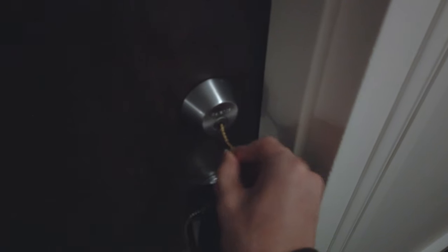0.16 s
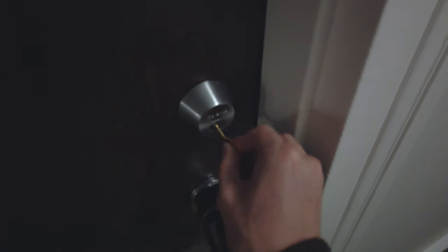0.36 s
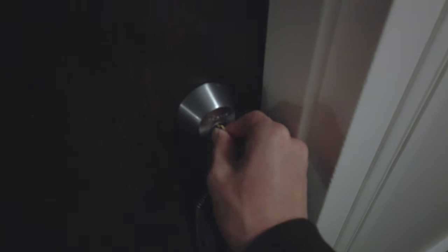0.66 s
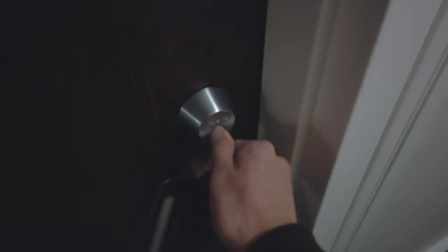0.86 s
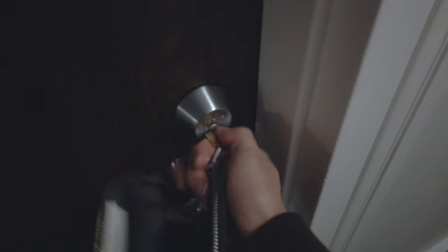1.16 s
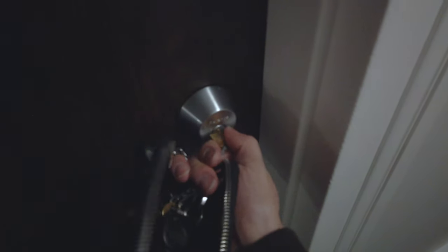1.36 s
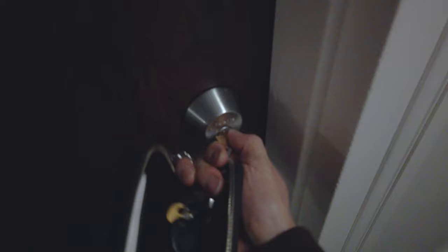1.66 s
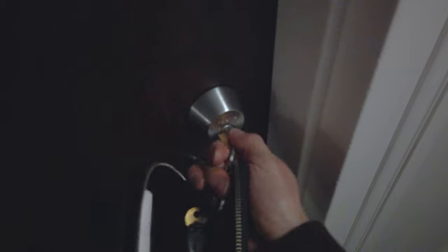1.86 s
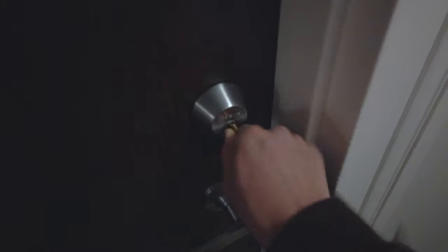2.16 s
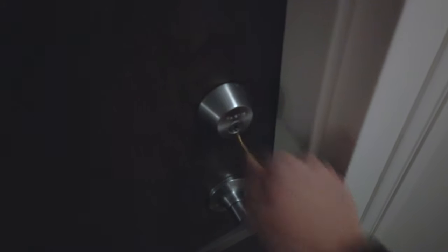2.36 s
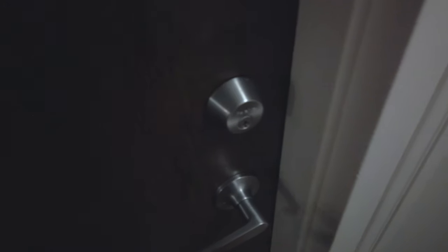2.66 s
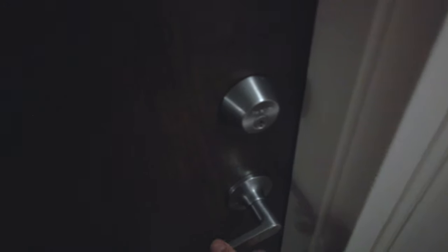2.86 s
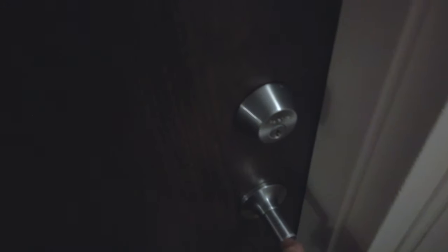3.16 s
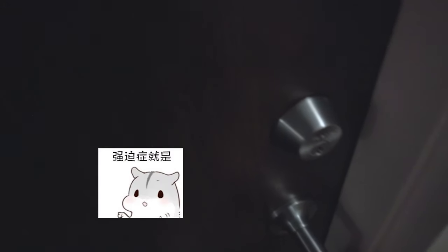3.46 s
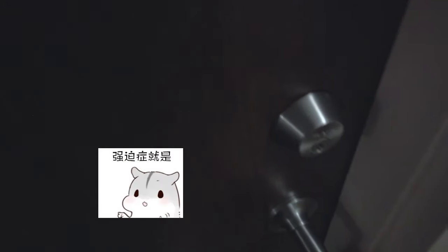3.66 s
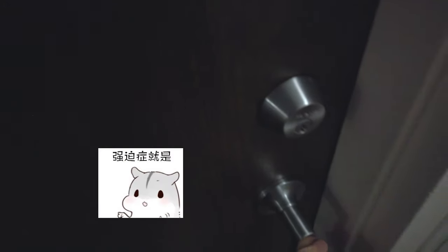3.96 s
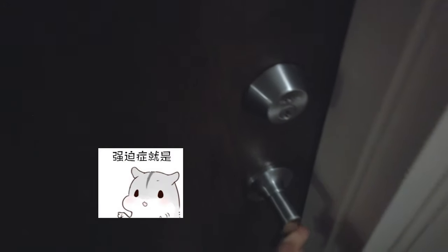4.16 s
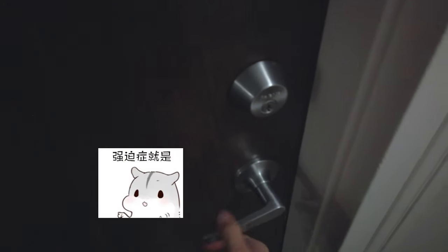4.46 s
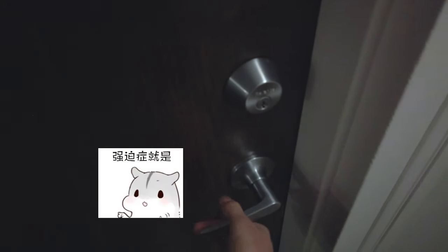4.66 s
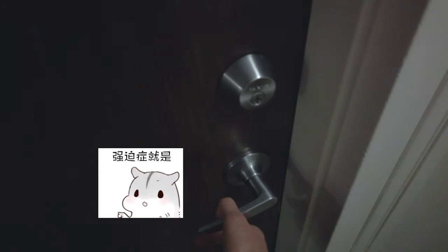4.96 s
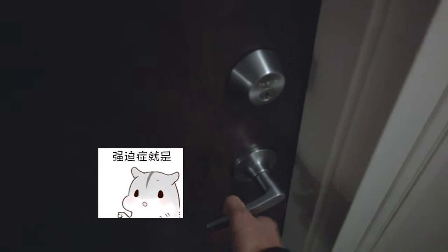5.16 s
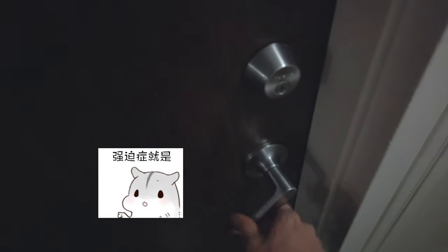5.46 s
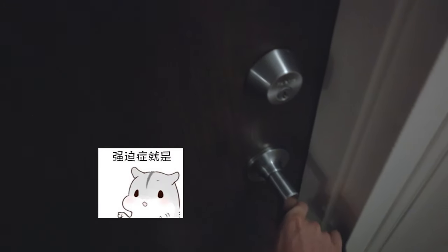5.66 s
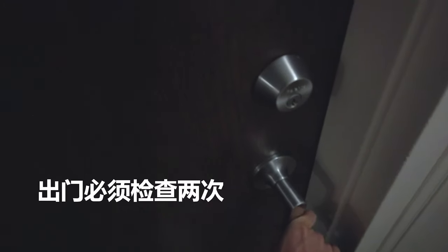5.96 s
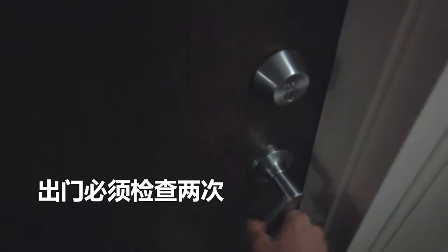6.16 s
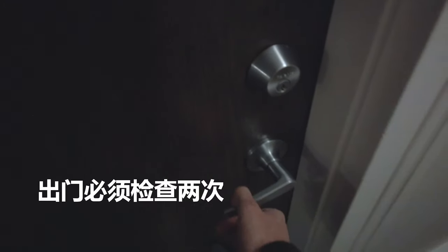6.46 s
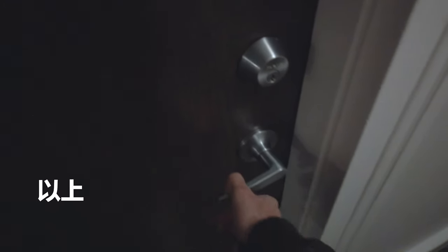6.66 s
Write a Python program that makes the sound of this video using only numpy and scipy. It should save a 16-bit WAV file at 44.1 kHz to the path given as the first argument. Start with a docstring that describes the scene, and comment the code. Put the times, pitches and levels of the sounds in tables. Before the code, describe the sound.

Close metallic clicks and door knocks from a turning lock, jingling keys, brief spring squeaks and uneven handle rattles, with short indoor echoes.

```python
"""Bolt, latch and lever knock into a door leaf as a deadbolt is turned and a locked door's handle is worked.
Each knock is a burst of uneven contacts ringing door and lock modes; small ticks ring the lock alone.
Filtered contact noise makes rubbing and leaf movement, a wavering harmonic tone the lever spring's squeaks.
A bunch of keys clinks and slides in resonant ticks; decaying noise gives hallway echoes over a steady hush.
Two microphone ports a few centimetres apart hear the sounds at slightly different moments."""
import sys
import numpy as np
from scipy import signal
from scipy.fft import rfft, irfft, next_fast_len
from scipy.io import wavfile

SR = 44100
rng = np.random.default_rng(int(sys.argv[2]) if len(sys.argv) > 2 else 0)


def inscribe(sig):
    """Save sig as 16-bit PCM at rate SR to the path in sys.argv[1].

    A 1-D sig is mono; a 2-D sig holds one channel per row.
    Samples are clipped to [-1, 1] before scaling.
    """
    pcm = np.round(np.clip(np.atleast_2d(sig).T, -1, 1) * 32767)
    wavfile.write(sys.argv[1], SR, pcm.astype(np.int16))


N = 299880
SIZE = next_fast_len(N + SR)   # transform length, leaves room for one second of echo
HZ = np.maximum(np.arange(SIZE // 2 + 1) * SR / SIZE, 1)
PORT_GAP_S = 0.0001666   # sound travel time between the ports

# resonances of door (first ten rows) and lock (the rest): (centre [Hz], basic width [Hz], relative level [dB])
BODY_MODES = [(130, 200, -12.5), (198, 56, 1.5), (248, 14.8, -0.5), (301.8, 34, 2.5), (353, 61, 2.5),
              (496, 96, 0.5), (716, 75, -6.5), (858, 106, -5), (1076, 98, -8), (1276, 260, -6.5),
              (1800, 470, -3.5), (2140, 153, -0.5), (2474, 450, -3), (2930, 186, -3), (3207, 110, -0.5),
              (3750, 700, -10), (4500, 430, -21), (5300, 940, -20), (6200, 2600, -26), (8200, 1900, -21),
              (10870, 870, -16)]
# resonances of the bunch of keys: (centre [Hz], basic width [Hz], relative level [dB])
KEY_MODES = [(3250, 90, -20), (4800, 120, -26), (6550, 150, -20), (7560, 110, -12), (8270, 50, -3),
             (8650, 150, -12), (9940, 45, -2), (10150, 60, -6), (10400, 100, -8), (10900, 130, -6),
             (11540, 55, -4), (12100, 90, -6), (12350, 55, -4), (13000, 200, -12), (13850, 45, -3),
             (15200, 200, -14), (11000, 6000, -24)]


def from_db(db):
    """Level in dB to amplitude."""
    return 10 ** (np.asarray(db) / 20)


def rms_one(x):
    """Scales a sound to an RMS of 1."""
    return x / np.sqrt(np.mean(x ** 2) + 1e-20)


def at_hz(points, hz):
    """Reads a table on a log-frequency axis."""
    points = np.array(points)
    return np.interp(np.log(hz), np.log(points[:, 0]), points[:, 1])


def in_time(rows, s):
    """The columns of a curve at the times s."""
    return [np.interp(s, np.array(rows)[:, 0], c) for c in np.transpose(rows)[1:]]


def add(track, s, sound):
    """Mixes a sound in at a time."""
    i = round(s * SR)
    track[..., i:i + sound.shape[-1]] += sound[..., :N - i]


def modes(table, hz, extra_db=0, damping=1):
    """Left and right response of parallel resonances; each radiates from its own patch, so has its own lag."""
    skirt = .6   # band that a mode radiates into, as a share of its pitch
    lean = 0.32   # the sources sit a little nearer the left port, as a share of the gap
    one_piece_hz = 600   # below this the leaf moves more and more as one piece and the lag shrinks
    centre, width, db = np.transpose(table)[:, :, None]
    signs = (-1.) ** np.arange(len(table))[:, None]
    gain = from_db(db + np.reshape(extra_db, (-1, 1))) * signs
    width = width * damping
    detune = centre ** 2 - hz ** 2
    each = gain * 1j * hz * width / (detune + 1j * hz * width)
    each = each * 1j * hz * centre * skirt / (detune + 1j * hz * centre * skirt)   # little sound far off pitch
    patch = np.clip(lean + rng.uniform(-0.99, 1, (len(table), 1)), -1, 1)
    lag = PORT_GAP_S * patch * np.minimum(centre / one_piece_hz, 1)
    half_lag = np.exp(1j * np.pi * hz * lag)
    return np.array([np.sum(each * half_lag, axis=0), np.sum(each / half_lag, axis=0)])


def grit(size, spread_db):
    """Contacts of very uneven strength and random sign."""
    strength_db = spread_db * np.minimum(rng.exponential(1, size), 5)
    return from_db(strength_db) * rng.choice([-1, 1], size)


def strike(contacts, table, extra_db, damping, low_hz, high_hz):
    """A short run of contacts rings the body; peak 1 between the two frequencies."""
    size = 2 ** 13
    hz = np.arange(size // 2 + 1) * SR / size
    spectrum = rfft(contacts, size) * modes(table, hz, extra_db, damping)
    in_band = irfft(spectrum * (hz > low_hz) * (hz < high_hz))
    return irfft(spectrum)[:, :-64] / np.abs(in_band).max()


def rubbed(table, level_db, spread_db, catch_db=0):
    """Dense uneven contacts ring a body; slow noise makes them catch and let go."""
    response = modes(table, HZ)
    catching = rms_one(signal.lfilter([1], [1, -1.99, .990025], rng.standard_normal(N)))
    contacts = rms_one(grit(N, spread_db) * from_db(catch_db * catching)) * from_db(level_db)
    even_response = response / np.sqrt(np.mean(np.abs(response) ** 2))
    return irfft(rfft(contacts, SIZE) * even_response, SIZE)[:, :N]


def efforts(rows, rise_db_per_s, fall_db_per_s):
    """Each effort swells, is held and fades, overlaps adding in power; one level in dB per thing moved."""
    t = np.arange(0, N + 64, 64) / SR
    start, held, *levels = np.transpose(rows)[:, :, None]
    rise = -rise_db_per_s * np.maximum(start - t, 0)
    shape = rise - fall_db_per_s * np.maximum(t - start - held, 0)
    curves = [10 * np.log10(np.sum(from_db(db + shape) ** 2, axis=0)) for db in levels]
    return [np.interp(np.arange(N) / SR, t, curve) for curve in curves]


def knocks():
    """Each blow is a rattle of contacts that builds and dies, with its own tilt and strongest ring."""
    # bolt, latch and lever blows: (time [s], peak from 560 to 4180 Hz [dB], door thud before a 0.5 dB cut [dB],
    # hardness [dB], bright crack before a 14 dB boost [dB], strongest ring [Hz], rattle length [s])
    blows = [(0.164, -35.5, -10, -7, -32, 1970, 0.023), (0.176, -31, -9, -15.5, -70, 874, 0.017),
             (0.494, -49.5, 3, -23, -67, 1160, 0.014), (0.662, -24, -15.5, -7.5, -14, 900, 0.0096),
             (0.604, -33, -13, -13, -30, 1730, 0.017), (0.723, -26.5, -13, 3, -10, 2282, 0.03),
             (0.745, -24, -3.5, -7, -37, 662, 0.0088), (1.203, -34.5, -26, 2, -12.5, 3200, 0.012),
             (1.248, -32.5, 6, 1, -6, 3880, 0.04), (1.28, -14, -4.5, -8.5, -35, 1090, 0.012),
             (1.284, -17.5, -23, -3.5, -10.5, 3230, 0.0055), (1.337, -14.5, -9, -8.5, -16.5, 868, 0.0097),
             (1.355, -36.5, 17.5, -6, -41, 258, 0.035), (2.175, -41, -13, 8, -13, 2190, 0.029),
             (2.206, -42, -1.5, -2.5, -4, 1543, 0.023), (2.298, -34.5, -4, -56, -30, 710, 0.0074),
             (2.475, -35, -24, 0, -25, 3160, 0.0052), (2.497, -35, -8, -4, -21, 2900, 0.006),
             (2.523, -28, -33, 2, -36, 2880, 0.0074), (2.531, -39.5, -22, -17, -36, 905, 0.0091),
             (2.576, -39.5, -36, 15, -27, 1710, 0.0067), (3.063, -46.5, -1, -5.5, -63, 533, 0.011),
             (3.167, -36, 4.5, -8.5, -38, 1810, 0.024), (3.403, -22.5, -1, -7.5, -26, 2750, 0.0087),
             (3.755, -50, 14.5, -11, -14, 2180, 0.016), (4.073, -47, -6, -3.5, -59, 2550, 0.01),
             (4.533, -19.5, -13, -2, -17, 2960, 0.0111), (4.541, -17, -8, 2, -21, 2034, 0.01214),
             (4.55, -18.5, -6, -7.5, -35, 1110, 0.013), (4.569, -28, -20, -4, -39, 1320, 0.0056),
             (4.579, -28, -9.5, -14, -45, 920, 0.0074), (4.595, -34, 16, -2, -36, 3230, 0.0084),
             (4.731, -20, -16, 0, -27.5, 1610, 0.0091), (4.799, -37, 8.5, 4, -15.5, 523, 0.013),
             (4.957, -45.5, 11, -13.5, -43, 510, 0.013), (5.269, -38, 0, -6, -43, 1124, 0.0086),
             (5.527, -47, -24, 7, -16, 3020, 0.0093), (5.551, -41, -22, 10, -22, 2950, 0.0083),
             (5.622, -40.5, -17, 8, -24, 2980, 0.014), (5.65, -33, -3, -2, -26, 3000, 0.006),
             (5.764, -21.5, 1.5, -1, -28, 2930, 0.004), (6.309, -41.5, -13, 18, -18, 3300, 0.015),
             (6.383, -32, -15, 14, -24, 2960, 0.02), (6.425, -16.5, -24, -4, -30, 730, 0.017),
             (6.478, -23, 16, 8, -16, 556, 0.0079), (6.501, -28, 3.5, 2, -26, 1980, 0.0047),
             (6.604, -42, -53, -7, -70, 496, 0.019)]
    out, t, hz = np.zeros((2, N)), np.arange(3072) / SR, np.array(BODY_MODES)[:, 0]
    for s, db, thud_db, hard_db, crack_db, ring_hz, length in blows:
        rise = 0.004 + 0.25 * length   # build-up time [s]
        fall = np.maximum(t - rise, 0) / max(length, .0005)
        envelope = np.minimum(t / rise, 1) ** 1.26 * np.exp(-fall ** 0.75)
        colour = at_hz([(350, thud_db - 0.5), (600, 0.0087), (1100, 0), (1700, hard_db),
                        (3300, hard_db), (4800, crack_db + 14.0)], hz)
        colour = colour + 7 * np.exp(-(np.log(hz / ring_hz) / .12) ** 2)
        colour = colour + rng.normal(0, 2.5, len(hz))
        # grip and latch position detune the modes from blow to blow
        body = np.array(BODY_MODES) * [[1 + shift, 1, 1] for shift in rng.normal(0, .03, len(hz))]
        body[np.argmin(np.abs(hz - ring_hz)), 0] = ring_hz
        contacts = grit(len(t), 6.62) * envelope
        blow = strike(contacts, body, colour, damping=0.95, low_hz=560, high_hz=4180)
        add(out, s - 0.4 * rise, from_db(db) * blow)
    return out


def ticks():
    """One small hard contact: only the upper modes of the lock answer, briefly."""
    # pins and spring ticking inside the lock: (time [s], peak from 2300 to 6000 Hz [dB], strongest ring [Hz])
    contacts_in_lock = [(0.114, -51, 2730), (0.349, -50, 4470), (0.55, -69, 2600), (0.608, -50, 3000),
                        (0.8663, -38, 3660), (0.9156, -52, 2500), (0.934, -44, 2600), (0.9754, -41, 2960),
                        (0.991, -40, 2700), (1.035, -47.5, 5300), (1.0718, -42, 2650), (1.1136, -60, 2470),
                        (1.179, -45, 2600), (1.578, -38, 2580), (1.6362, -49.5, 3650), (1.8087, -50, 2940),
                        (1.894, -46.5, 3390), (1.9236, -51, 2670), (2.4109, -43, 3200), (2.4393, -40, 2820),
                        (2.455, -42, 3000), (2.66, -52, 3210), (2.674, -47, 3200), (2.698, -57, 3060),
                        (2.773, -49, 3200), (2.83, -61, 2480), (3.633, -52, 3140), (4.923, -37.5, 3200),
                        (4.9797, -42, 2800), (5.006, -41.5, 2900), (5.0444, -54, 2780),
                        (5.113, -53.5, 2430), (5.1956, -51, 3060), (5.21, -49, 2640), (5.235, -55, 2680),
                        (5.4244, -54, 3170), (5.452, -55, 3170), (5.581, -46, 3280), (5.7, -45, 2900),
                        (6.009, -47, 3750), (6.151, -62, 2800), (6.243, -51, 2930), (6.719, -40, 3250)]
    lock = np.array(BODY_MODES)[10:]
    hz, width, mode_db = lock.T
    out, t = np.zeros((2, N)), np.arange(512) / SR
    for s, db, ring_hz in contacts_in_lock:
        colour = -mode_db + 14 * np.exp(-(np.log(hz / ring_hz) / .1) ** 2)   # own mode levels cancelled
        colour = colour - 18 * np.abs(np.log2(hz / ring_hz))
        colour = colour - 10 * np.log10(width)   # wide modes take less
        contacts = grit(len(t), 4.) * np.exp(-t / .0015)
        add(out, s, from_db(db) * strike(contacts, lock, colour, damping=2, low_hz=2300, high_hz=6000))
    return out


def hand_strokes():
    """Level curves of the hand on key and lever: rubbing in door, rubbing in lock, keys sliding."""
    # movements: (time at full effort [s], held [s], door rubbing [dB], lock rubbing [dB],
    # keys sliding before the gains of the tinkle [dB])
    strokes = [(0.0, 0.022, -56.5, -68.5, -87), (0.2, 0.19, -84, -80, -83),
               (0.59, 0.081, -45.5, -52.5, -85), (0.68, 0.0051, -57, -39, -54),
               (0.81, 0.34, -55, -55.5, -78), (1.36, 0.037, -43, -80, -70), (1.49, 0.053, -48.5, -52, -75),
               (1.66, 0.077, -59, -95, -99), (2.25, 0.093, -60.5, -56.5, -61.5),
               (2.39, 0.016, -56.5, -52, -62), (2.46, 0.04, -54.5, -51.5, -71),
               (2.56, 0.14, -84.5, -62.5, -57), (2.82, 0.0053, -69, -59.5, -69),
               (3.16, 0.022, -59.5, -79, -100), (3.25, 0.021, -69, -48, -84), (3.36, 0.05, -54, -51, -76),
               (3.5, 0.24, -76, -68.5, -75), (4.05, 0.59, -70, -73, -87), (4.36, 0.05, -66, -63.5, -90),
               (4.5, 0.01, -72, -62, -85), (4.55, 0.005, -42.5, -45.5, -68), (4.7, 0.29, -61.5, -64.5, -74),
               (5.1, 0.16, -69.5, -77, -84), (5.42, 0.029, -92, -71, -74.5),
               (5.63, 0.059, -46.5, -50.5, -71), (5.7, 0.081, -48.5, -46.5, -59.5),
               (5.96, 0.19, -66, -67, -71), (6.2, 0.13, -68, -72, -83), (6.33, 0.0075, -59, -71, -71),
               (6.4, 0.025, -46.5, -42, -84), (6.47, 0.0016, -34.5, -56, -75),
               (6.69, 0.093, -56.5, -54.5, -72)]
    return efforts(strokes, rise_db_per_s=220.5, fall_db_per_s=183.5)


def rubbing(door_db, lock_db):
    """Metal rubs: smooth contacts ring the door, rougher and more catching ones ring the lock."""
    door = rubbed(BODY_MODES[1:10], door_db, spread_db=0.0, catch_db=1.0)
    return door + rubbed(BODY_MODES[10:], lock_db, spread_db=8., catch_db=4.)


def squeaks():
    """Stick-slip of the spring: a wavering tone; strong and weak slips in turn give the half partials."""
    # two lever spring squeaks, each a curve: (time [s], pitch before wavering [Hz], level before faltering [dB])
    curves = [
        [(3.22, 2974, -56), (3.234, 2940, -47), (3.239, 2930, -33), (3.251, 2870, -32), (3.26, 2966, -30),
         (3.268, 2912, -43), (3.39, 2860, -61), (3.52, 2950, -76), (3.56, 2930, -80)],
        [(4.33, 3040, -73), (4.4, 2970, -65.5), (4.464, 2940, -61), (4.49, 2930, -24.5), (4.502, 2917, -26),
         (4.515, 2930, -32), (4.53, 3070, -50), (4.54, 2900, -40)],
    ]
    # partials: (multiple of pitch, level in the first squeak [dB], level in the second [dB],
    # growth with force [exponent])
    partials = [(.5, -21, -38, .6), (.75, -32, -28, -.45), (1, 1, 0, 0), (1.5, -25, -38, .7),
                (2, -21, -41, .7), (2.5, -38, -56, .7), (3, -29, -50, .7)]
    right_lags = (.0001, -.00002)   # lag of the main tone at the right port [s]
    out = np.zeros((2, N))
    for k, (rows, lag) in enumerate(zip(curves, right_lags)):
        s = np.arange(rows[0][0], rows[-1][0], 1 / SR)
        hz, db = in_time(rows, s)
        waver = rms_one(signal.lfilter([1], [1, -1.96, .9604], rng.standard_normal((2, len(s)))))
        phase = 2 * np.pi * np.cumsum(hz * (1 + 0.007 * waver[0])) / SR
        rasp = rms_one(signal.lfilter([1], [1, -1.9, .9025], rng.standard_normal(len(s))))
        force = from_db(db - db.max())   # share of the hardest slip
        late = 2 * np.pi * hz * lag * np.array([[0], [1]])
        tone = 0
        for row in partials:
            multiple, growth = row[0], row[3]
            main = multiple == 1
            blur = .4 * (1 - force) if main else .8   # uneven slips blur the partials
            wave = np.sin(multiple * phase - late * main)
            tone = tone + from_db(row[1 + k]) * force ** growth * wave * (1 + blur * rasp)
        falter_db = 7 * (1 - .8 * np.sqrt(force)) * np.tanh(waver[1])   # light slips falter most
        level = np.sqrt(2) * from_db(db + falter_db)
        add(out, s[0], level * tone * signal.windows.tukey(len(s), .15))
    return out


def clinks():
    """Keys strike in a quick run of ticks; the keys that touch ring loudest, the others less."""
    # keys striking each other: (time [s], peak from 7760 to 14000 Hz [dB], strongest ring [Hz],
    # damping by the fingers, held to at least 0.4 [factor on ring width])
    touches = [(0.182, -43, 10360, 1.6), (0.311, -51, 14100, 0.8), (0.699, -37, 10050, 1.6),
               (0.81, -47, 7570, 1), (0.833, -44, 11200, 0.74), (1.017, -38.5, 11400, 1.7),
               (1.25, -46, 12000, 1), (1.468, -31.5, 12030, 1.4), (1.528, -49, 12400, 1.1),
               (1.579, -55.5, 14100, 0.9), (1.87, -63, 10230, 0.76), (2.222, -35, 9650, 7.9),
               (2.24, -53, 10400, 2), (2.291, -48, 10400, 1.3), (2.359, -50, 8460, 1.1),
               (2.378, -34.5, 9850, 0.6), (2.485, -47, 10460, 2), (2.515, -40, 11000, 2.8),
               (2.5792, -33, 10090, 0.32), (2.601, -33, 10150, 0.8), (2.6559, -45, 11000, 1.1),
               (2.693, -34, 11040, 4.9), (2.711, -64, 10300, 3), (2.79, -47, 8300, 1.8),
               (2.854, -51, 12400, 2), (3.3268, -58, 12400, 1.3), (3.439, -48, 9740, 1.1),
               (3.504, -48, 8200, 0.8), (3.574, -48.5, 10950, 1.5), (3.714, -56, 9800, 1.4),
               (3.791, -48, 9940, 1.2), (3.864, -57, 10170, 0.9), (4.813, -50, 10850, 1.1),
               (4.833, -47, 12030, 0.5), (4.9173, -34, 13660, 1), (5.345, -59, 12500, 0.91),
               (5.418, -51, 13800, 0.43), (5.575, -45.5, 8280, 0.99), (5.699, -45.5, 9930, 0.58),
               (5.732, -40, 10850, 1.3), (5.826, -47, 12100, 1), (5.899, -44, 9570, 0.33),
               (5.928, -42.5, 9740, 0.34), (5.961, -44, 12800, 0.9), (6.116, -43, 10900, 4),
               (6.315, -41.5, 11200, 0.57), (6.457, -46, 10600, 1.5), (6.532, -40, 9950, 0.56),
               (6.717, -28.5, 8271, 0.61), (6.72, -41, 9941, 0.51), (6.733, -34, 11541, 0.55)]
    out, t, hz = np.zeros((2, N)), np.arange(2048) / SR, np.array(KEY_MODES)[:, 0]
    for s, db, ring_hz, damping in touches:
        contacts = grit(len(t), 2.5) * np.minimum(t / 0.0024, 1) ** 2 * np.exp(-t / 0.015)
        off = np.abs(np.log(hz / ring_hz))
        nearest = off[:-1].min()   # the last, very broad mode is left out
        touched = 22 * np.exp(-((off - nearest) / .025) ** 2) + rng.normal(0, 4.5, len(hz))
        clink = strike(contacts, KEY_MODES, touched, max(damping, .4), low_hz=7760, high_hz=14000)
        add(out, s - 0.002, from_db(db) * clink)
    return out


def tinkle(level_db, per_s):
    """Keys slide along each other in the palm: every mode is ticked at moments of its own, and damped."""
    out = np.zeros((2, N))
    for hz, width, db in KEY_MODES:
        r, w = np.exp(-np.pi * width * 1.8 / SR), 2 * np.pi * hz / SR
        moments = rng.random(N) < (per_s + 3 * width) / SR   # wide modes are ticked more often
        contacts = rms_one(grit(N, 2.6) * moments) * from_db(level_db + 16.0 + db)
        rung = signal.lfilter([1 - r * r], [1, -2 * r * np.cos(w), r * r], contacts)
        right_lag = round(rng.uniform(-1.3, 1) * PORT_GAP_S * SR)
        out += [rung, np.roll(rung, right_lag)]
    return out


def leaf_movement():
    """Shoves set the door leaf swaying and humming in its frame, as noise through its low resonances."""
    # shoves: (time at full force [s], held [s], sway level [dB], hum level [dB])
    shoves = [(0.1, 0.048, -64, -51.5), (0.24, 0.0058, -45.5, -44.5), (0.36, 0.019, -49, -74),
              (0.58, 0.016, -45.5, -46.5), (0.7, 0.097, -37.5, -41), (0.97, 0.21, -42, -46.5),
              (1.34, 0.18, -53.5, -53.5), (2.0, 0.022, -62, -73), (2.39, 0.029, -46, -48),
              (2.5, 0.039, -66, -43), (3.19, 0.0093, -49.5, -49), (3.45, 0.0089, -42.5, -46.5),
              (3.75, 0.19, -51, -61), (4.09, 0.1, -44, -73.5), (4.58, 0.021, -45.5, -40.5),
              (4.98, 0.038, -53, -51.5), (5.28, 0.045, -47, -54), (5.6, 0.2, -62, -49),
              (5.82, 0.0071, -37.5, -44.5), (6.14, 0.03, -45.5, -65), (6.45, 0.11, -57, -44),
              (6.74, 0.017, -52, -60)]
    # slow sway of the leaf: (centre [Hz], width [Hz], relative level [dB])
    sway_modes = [(24.9, 18.6, 4), (61, 39, -34.5)]
    # bending of the leaf: (centre [Hz], width [Hz], relative level [dB])
    hum_modes = [(76.4, 10, -4), (115.3, 12.5, 3), (185, 44, -5.5)]
    sway_db, hum_db = efforts(shoves, rise_db_per_s=117.5, fall_db_per_s=116)
    leaf = rubbed(sway_modes, sway_db, spread_db=1.5) + rubbed(hum_modes, hum_db, spread_db=1.5)
    # faint low rumble, opposite in the two ports, that follows the sway level
    side_rumble = from_db(-27) * rubbed(sway_modes, sway_db, spread_db=1.5) * [[1], [-1]]
    return leaf + side_rumble


def from_all_sides(mid, side):
    """Two unrelated spectra become left and right, alike while the wave is long against the port gap."""
    alike = np.sinc(2 * HZ * PORT_GAP_S)
    return np.sqrt(1 + alike) * mid + np.sqrt(1 - alike) * side * [[1], [-1]]


def hallway():
    """Spectrum of echoes: noise that dies octave by octave, starting after the first wall."""
    # time to fall by 60 dB: (frequency [Hz], decay time [s])
    decay_s = [(60, 0.68), (300, 1), (1000, 0.63), (3000, 0.41), (8000, 0.39), (16000, 0.27)]
    t, tail = np.arange(SR) / SR, 0
    for hz in 30 * 2. ** np.arange(10):
        edges = [hz / np.sqrt(2), min(hz * np.sqrt(2), .45 * SR)]
        sos = signal.butter(2, edges, "band", fs=SR, output="sos")
        decay = from_db(-60 * t / at_hz(decay_s, hz))
        tail = tail + signal.sosfilt(sos, rng.standard_normal((2, SR))) * decay
    tail = tail * np.clip((t - .004) / 0.00059, 0, 1)
    return from_all_sides(*rfft(tail / np.sqrt(np.sum(tail[0] ** 2)), SIZE))


def heard(x, hall):
    """Direct sound plus the hallway's echoes of its left channel."""
    return x + irfft(rfft(np.atleast_2d(x)[0], SIZE) * hall, SIZE)[:, :N]


def air():
    """Steady hush of the building: noise shaped in frequency and spread over both ports."""
    # still hallway: (frequency [Hz], relative spectral level [dB])
    hush = [(12, -88.5), (20, 1), (44, 7), (86, -1), (177, 2.5), (367, -10), (542, -8), (1060, -17.5),
            (2990, -22.5), (6180, -38), (10800, -32.5), (13500, -53.5), (16000, -66)]
    noise = rfft(rng.standard_normal((2, SIZE))) * from_db(at_hz(hush, HZ))
    return from_db(-59.5) * rms_one(irfft(from_all_sides(*noise), SIZE)[:, :N])


def scene():
    """Door, squeaks and keys with their echoes, then the moving leaf and the hush."""
    hall = hallway()
    door_hall_db, squeak_hall_db, keys_hall_db = -13, -27, -20   # echo gains
    door_db, lock_db, slide_db = hand_strokes()
    door = knocks() + ticks() + rubbing(door_db, lock_db)
    keys = clinks() + tinkle(slide_db, per_s=300.0)
    out = heard(door, from_db(door_hall_db) * hall)
    out += heard(squeaks(), from_db(squeak_hall_db) * hall)
    out += heard(keys, from_db(keys_hall_db) * hall)
    return out + leaf_movement() + air()


def record(dry):
    """A steep low-pass cuts the top above 15.9 kHz."""
    return signal.sosfilt(signal.ellip(10, .5, 70, 15900, fs=SR, output="sos"), dry)


dry = scene()
out = record(dry)
inscribe(out)
```